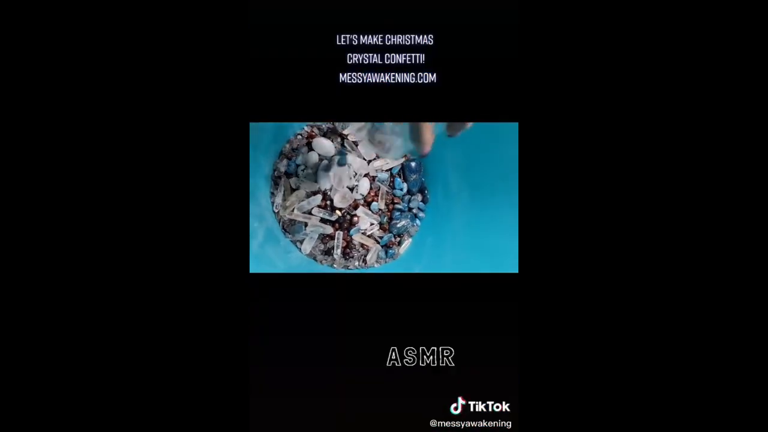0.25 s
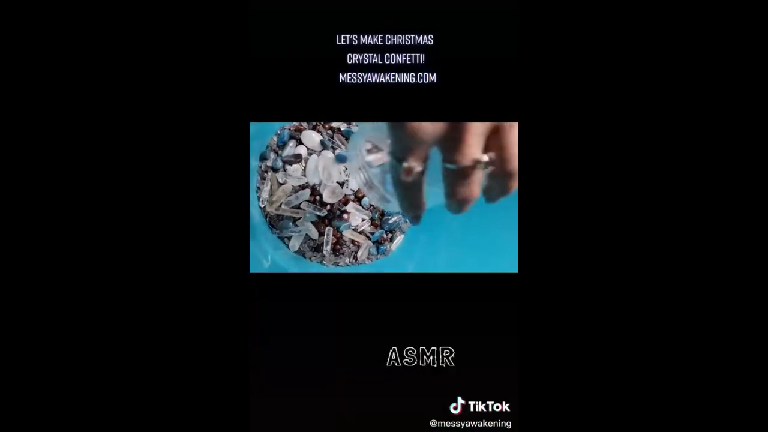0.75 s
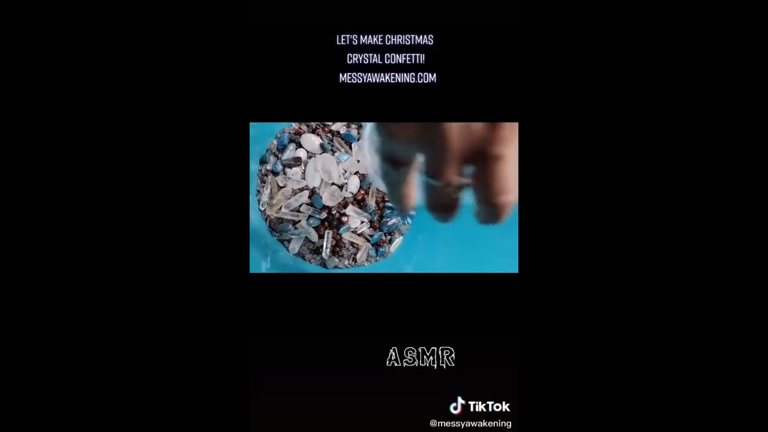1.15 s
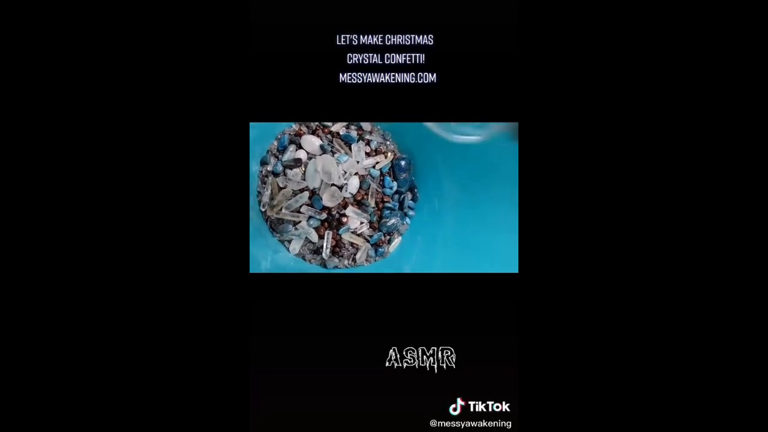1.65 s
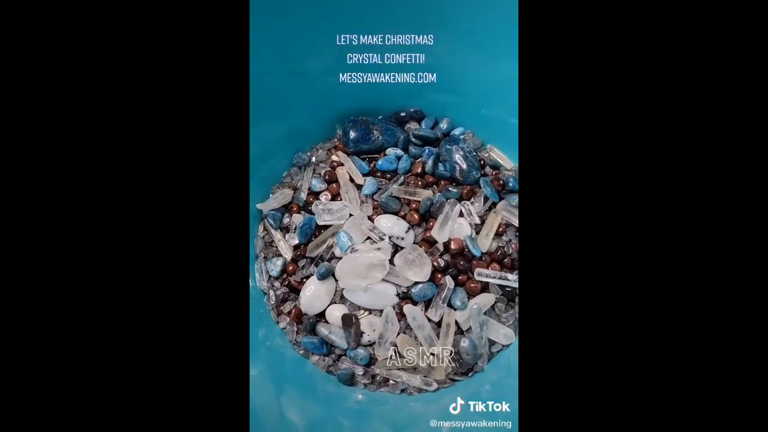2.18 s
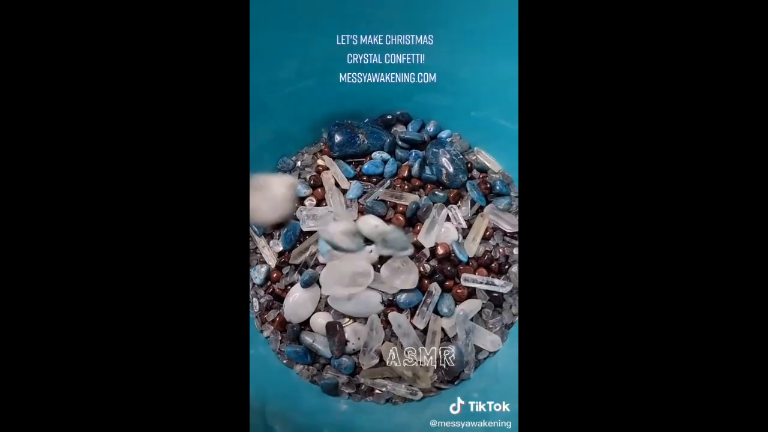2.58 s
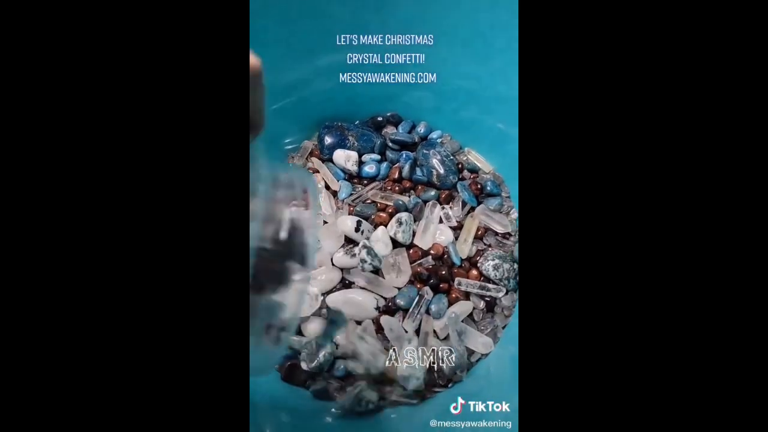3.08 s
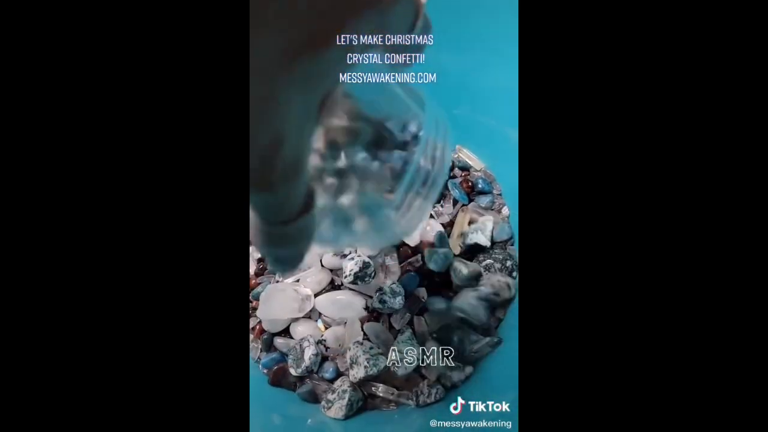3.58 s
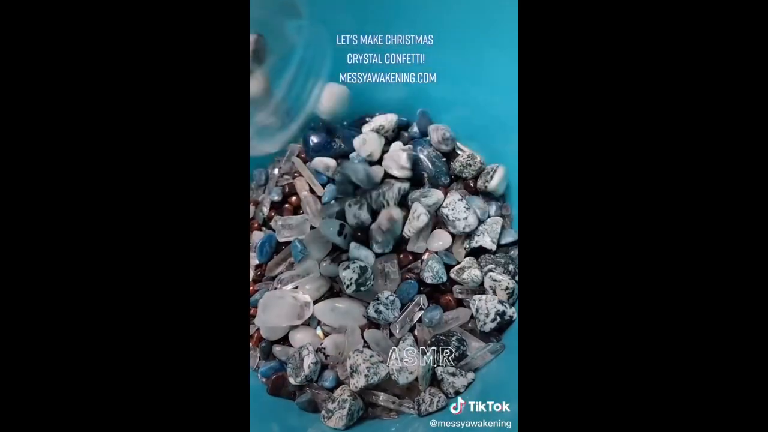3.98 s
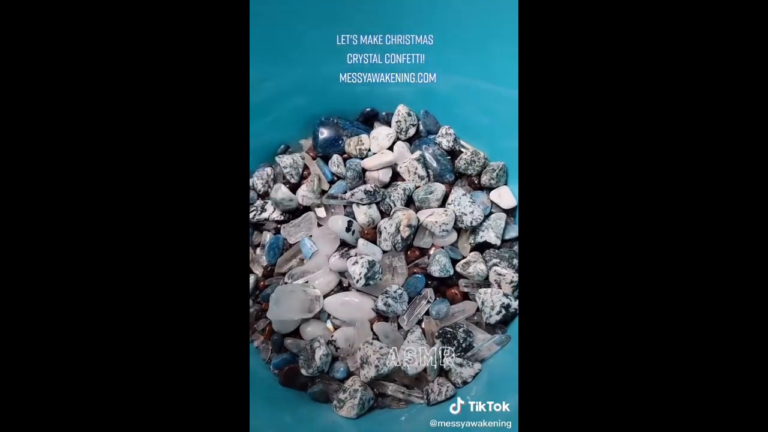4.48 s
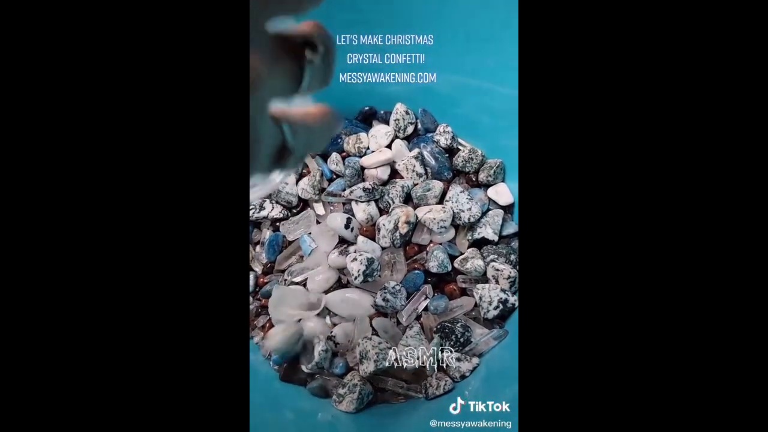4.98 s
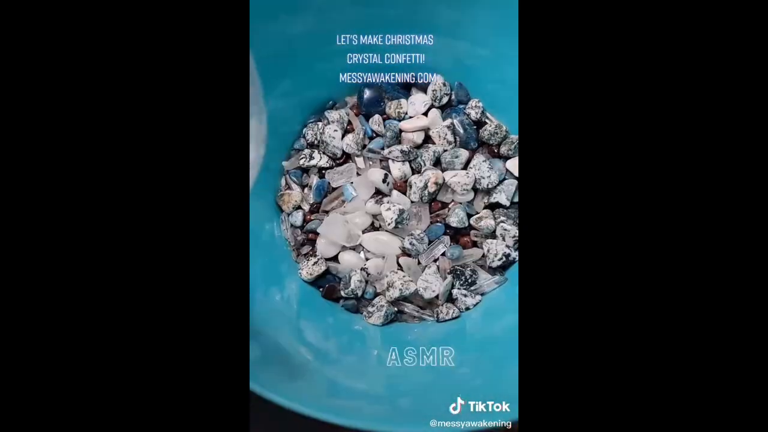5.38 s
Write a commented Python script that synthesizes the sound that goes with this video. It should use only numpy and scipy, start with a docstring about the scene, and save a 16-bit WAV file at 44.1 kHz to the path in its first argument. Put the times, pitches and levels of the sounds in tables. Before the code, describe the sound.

Small stone chips rattle and clink out of hollow-sounding glass jars onto a heap in a plastic bowl, close up, in separate bursts with brief silences.

```python
"""Stone chips poured from glass jars

Stone chips are shaken from glass jars onto a heap in a plastic bowl, close to the microphone. Single chips
clack and rebound over a dense stream of small ticks. Chips that roll and knock in the glass make the air in the
jar hoot: a wide jar low, a small jar an octave higher. Twice all sound stops for a moment, just as the small
jar takes over."""
import sys
import numpy as np
from scipy import signal
from scipy.fft import rfft, irfft
from scipy.io import wavfile
from scipy.ndimage import uniform_filter1d

SR = 44100
rng = np.random.default_rng(int(sys.argv[2]) if len(sys.argv) > 2 else 0)


def store_wav(level_fs):
    """Save 16-bit WAV to argv[1]."""
    pcm = np.round(np.clip(np.atleast_2d(level_fs), -1, 1) * 32767)
    wavfile.write(sys.argv[1], SR, pcm.T.astype(np.int16))


N = 249165
TIME = np.arange(N) / SR
SLOW_TIME = TIME[::32]  # coarse steps are enough for slow controls
EDGE_HZ = 10050  # the sound ends above this pitch

# chips knocking on the wall of the wide jar: t/s, level/dB (before a common trim), pitch of the air inside f/Hz
WIDE_JAR_KNOCKS = [(0.022, -17.5, 345), (0.133, -16, 346), (0.546, -15.5, 349), (0.593, -17, 375),
                   (0.711, -21, 337), (0.764, -18.5, 342), (0.862, -20, 325), (0.892, -21, 379),
                   (1.044, -19.5, 366), (1.11, -18, 367), (2.254, -14, 352), (2.444, -16, 311),
                   (2.644, -20.5, 254), (2.983, -21.5, 349), (3.256, -15, 315), (3.429, -10, 334),
                   (3.546, -11, 345), (3.574, -7, 342), (3.613, -6, 330), (3.685, -8.5, 328),
                   (3.801, -5.5, 332), (3.832, -7, 368), (3.996, -7.5, 360.6), (4.055, -6.5, 367),
                   (4.101, -16.5, 392), (4.518, -21.5, 350), (4.605, -23, 368), (4.649, -9, 330)]


def tick(contact_s=0.00017, ring_s=0.012, ring_db=-8, body_db=-3, body_s=0.0012, body_hz=1700, lowest_hz=900, count=4):
    """Stone on stone: a very short crack, the dull note of the chip's body and a few brief rings, varying by chip."""
    t = TIME[:SR // 100]
    crack = unit(rng.standard_normal(len(t)) * t * np.exp(-t / contact_s))
    note_hz = body_hz * 2 ** rng.uniform(-0.91, 1)
    body = unit(np.sin(2 * np.pi * note_hz * t) * np.exp(-t / body_s))
    hz = rng.uniform(lowest_hz, EDGE_HZ, (count, 1))
    life = ring_s * rng.uniform(.5, 2, (count, 1))
    rings = unit((np.sin(2 * np.pi * hz * t) * np.exp(-t / life)).sum(0))
    return unit(crack + amp(body_db) * body + amp(ring_db) * rings)


def stream(flow_db, per_s=1200, spread_db=1.5, crowding=.3, clump_db=2.5, count=400):
    """Chips of many shapes tick at random; a stronger flow means more of them at once, tumbling in clumps."""
    rate = per_s * amp(crowding * (flow_db - flow_db.max()))  # per_s holds at the strongest flow
    shapes = [tick() for _ in range(count)]
    ticks = np.zeros(N)
    luck = rng.random(N)
    size = amp(spread_db * rng.exponential(1, N))
    shape = rng.integers(0, count, N)
    for n in np.flatnonzero(luck < rate / SR):
        add(ticks, TIME[n], size[n] * shapes[shape[n]])
    clumps = uniform_filter1d(rng.standard_normal(N), size=520)
    ticks *= amp(clump_db * rate / rate.max() * clumps / clumps.std())
    return amp(flow_db) * evened(ticks)


def flow(attack_s=0.0045, fall_db_per_s=314, settle_db=-14, settle_s=0.34, lead_in_db=-18.5, lead_in_rise_db_per_s=304.5):
    """Level and treble of the stream in dB: slides start quickly, run and die away, while a few chips go on settling."""
    # each shake of a jar lets a slide of chips go; chips still inside the jar sound duller:
    # t/s, length/s, level/dB (before the stream's trim), treble/dB
    slides = [(0, 0.18, -31.5, -8.5), (0.169, 0.069, -27.5, 6.5), (0.297, .1, -24.5, 1.5),
              (0.514, 0.18, -34, -4.5), (0.707, 0.13, -32, 0), (0.914, 0.071, -44.5, 3),
              (1.191, 0.077, -40, -1.5), (1.313, 0.16, -40, 2.5), (1.735, 0.17, -24, 4),
              (2.007, 0.032, -36.5, 7), (2.107, 0.27, -22, 2), (2.2, 0.083, -17, -0.5),
              (2.424, 0.1, -22, 1.5), (2.53, 0.17, -27.5, 3), (2.599, 0.13, -26.5, 4),
              (2.749, 0.08, -24, 2), (2.855, 0.034, -20, 1), (2.986, 0.017, -19.5, -2.5),
              (3.041, 0.15, -23.5, 1), (3.233, 0.18, -22.5, -0.5), (3.465, 0.055, -20, -1.5),
              (3.557, 0.12, -20.5, 2), (3.703, 0.24, -21.5, 2), (3.99, 0.039, -24.5, 5),
              (4.094, 0.1, -29.5, -2), (4.261, 0.072, -30, 4.5), (4.782, 0.015, -37, 6.5),
              (4.84, 0.27, -44.5, -0.5), (4.953, 0.0099, -32.5, -9), (5.291, 0.052, -43, 11),
              (5.345, 0.28, -32.5, 10.5), (5.415, .1, -25, 6)]
    t = SLOW_TIME
    s, length, db, treble_db = np.transpose(slides)[:, :, None]
    before = np.maximum(s - t, 0)
    after = np.maximum(t - s - length, 0)
    lead_in = amp(lead_in_db - lead_in_rise_db_per_s * before)  # the first chips slip just before the rest
    attack = np.maximum(np.clip((t - s) / attack_s, 0, 1), lead_in)
    settling = amp(settle_db) * np.maximum(1 - after / settle_s, 0) ** 2
    release = np.maximum(amp(-fall_db_per_s * after), settling)
    power = (amp(db) * attack * release) ** 2 + 1e-12
    total = power.sum(0)
    mean_treble_db = (power * treble_db).sum(0) / total  # the loudest slide counts most
    return np.interp(TIME, t, 10 * np.log10(total)), np.interp(TIME, t, mean_treble_db)


def clacks(rebound_db=-5, rebound_s=0.004, contact_s=0.00053, body_s=0.0018, count=6, size=4096):
    """Each hard landing jostles its neighbours, which answer with smaller ticks."""
    # single chips that land hard: t/s, level/dB (over a millisecond), brightness/dB per octave
    landings = [(0.118, -14.5, -5), (0.16, -12, 3), (0.2523, -14.5, 0), (.268, -20, -5),
                (0.3116, -13, -0.5), (0.3603, -13.5, -4), (.384, -13.5, 1), (0.4004, -10, -2.5),
                (0.4841, -17.5, -3.5), (0.5883, -17.5, 1.5), (0.595, -10.5, -3), (.6189, -14.5, 1.5),
                (0.7257, -14, -1.5), (0.7574, -17.5, 1), (0.828, -20, 2), (0.8805, -12, 2),
                (1.1216, -14.5, 4), (1.1253, -23, -6), (1.1792, -15.5, 1.5), (1.245, -14, -1),
                (1.3246, -13, 1.5), (1.418, -27.5, 4), (1.5289, -27, 2), (1.7393, -9, -13.5),
                (1.745, -1.5, -4), (1.862, -8.5, -1), (1.916, -12, -0.5), (1.947, -16, 2.5),
                (1.965, -18, 2), (2.08, -22, -1), (2.115, -12, 4), (2.2323, -10.5, 2), (2.478, -10, 3),
                (2.544, -10.5, 0), (2.6172, -6.5, 1), (2.6302, -8.5, -0.5), (2.645, -7, 1),
                (2.762, -11.5, 5.5), (2.7784, -9.5, -0.5), (2.866, -11, 2), (2.881, -8.5, -1),
                (2.983, -15, -3), (3, -9.5, 4.5), (3.164, -11, 4), (3.238, -16, -5), (3.251, -8.5, -0.5),
                (3.301, -10, 2.5), (3.318, -9, 0.5), (3.3599, -8, -0.5), (3.4357, -11.5, 0.5),
                (3.454, -11, 0.5), (3.57, -12.5, 5), (3.64, -6, -1), (3.721, -12, 0), (3.76, -8.5, 0.5),
                (3.7844, -8.5, 4.5), (3.852, -7, 2), (3.954, -9.5, -1.5), (3.998, -13.5, 2),
                (4.042, -17.5, 1.5), (4.0762, -15, 2), (4.114, -12, 3.5), (4.1544, -11.5, 0),
                (4.181, -13.5, -4.5), (4.244, -8, 0), (4.284, -10, 0), (4.311, -7.5, -1),
                (4.398, -25.5, -2), (4.556, -26.5, -1), (4.648, -16.5, -9), (4.792, -10, 1.5),
                (4.8018, -8.5, 0), (4.864, -20.5, 3.5), (4.901, -18.5, 0.5), (4.912, -32, 34),
                (4.947, -13, -1), (4.9773, -23.5, -4), (5.075, -24, -2.5), (5.113, -25, 0),
                (5.2998, -27.5, 1), (5.46, -9.5, 2)]
    out = np.zeros(N)
    hz = np.fft.rfftfreq(size, 1 / SR)
    octaves = np.log2(np.clip(hz, 900, EDGE_HZ) / EDGE_HZ)
    audible = 1 / np.sqrt(1 + (hz / EDGE_HZ) ** 20)
    for s, db, brightness in landings:
        rebounds = np.zeros(size)
        for delay in rng.exponential(1, count):
            add(rebounds, delay * rebound_s, tick())
        hit = amp(rebound_db) * unit(rebounds)
        add(hit, 0, tick(contact_s=contact_s, body_s=body_s))
        tilt = amp(brightness * octaves)
        hit = unit(irfft(rfft(hit) * tilt * audible)[:size // 2])
        add(out, s, amp(db) * np.sqrt(SR / 1000) * hit)
    return out


def chips_by_jar(impacts, small):
    """The impacts take on a different colour for the chips of each jar."""
    # colour of the chips from each jar: f/Hz, relative level/dB per Hz
    wide_jar_chips = [(200, -11.5), (520, -2.5), (850, -2), (1350, -1.5), (1750, -4), (2800, -1), (4400, 0),
                      (7000, 1), (10000, -6.5)]
    small_jar_chips = [(200, -19), (900, -14), (1300, -11), (1950, -12.5), (2200, -2), (3500, -.5),
                       (4800, -2.5), (6500, -4), (10000, -14.5)]
    return colour(impacts * (1 - small), wide_jar_chips) + colour(impacts * small, small_jar_chips)


def bowl(impacts):
    """The falling chips shake the plastic bowl, which answers with low thuds."""
    # how heavily the chips shake the bowl: t/s, level/dB (against the impacts)
    weight = [(1.2, -22), (1.8, -30), (2.25, -17), (2.6, -11), (4.1, -8.5), (5.3, -28)]
    # colour of the bowl: f/Hz, relative level/dB per Hz
    bowl_colour = [(30, -15.5), (90, -15), (270, 14), (520, 10), (1200, -41.5)]
    return colour(impacts * amp(curve(weight)), bowl_colour)


def wide_jar(flow_db, small):
    """Knocks make the wide jar hoot low; rolling chips keep it hooting when the small jar is not pouring."""
    # resonances, the lowest being the air inside: f/Hz, t60/s (time to fall 60 dB), relative level/dB
    modes = [(354.6, 0.072, 8), (778, 0.04, -5), (2330, 0.15, -22)]
    knocking = knocks(WIDE_JAR_KNOCKS, modes, push_s=0.0056, level_db=-1.5)
    return knocking + (1 - small) * roll_strength(flow_db) * rolling(modes)


def roll_strength(flow_db, knock_db=-14.5, rise_s=0.021, fade_s=0.035, under_stream_db=-8):
    """How hard chips roll in the wide jar: a swell around each knock, and a share of the stream."""
    t = SLOW_TIME
    s, db, _ = np.transpose(WIDE_JAR_KNOCKS)[:, :, None]
    swells = amp(db + knock_db) * np.exp(-np.maximum((s - t) / rise_s, (t - s) / fade_s))
    around_knocks = np.interp(TIME, t, np.linalg.norm(swells, axis=0))
    return np.hypot(around_knocks, amp(flow_db + under_stream_db))


def small_jar(flow_db, small, roll_db=-1.5, idle_db=-41, mouth_hz=500):
    """The small jar hoots higher, from knocks and from chips rolling as it pours; its small mouth gives no bass."""
    # chips knocking on its wall: t/s, level/dB (before a common trim), pitch of the air inside f/Hz
    wall_knocks = [(1.742, -9.5, 737), (1.834, -6, 767), (2.118, -2.5, 722), (2.164, -2.5, 726),
                   (2.216, 0, 718), (2.265, -4, 743), (2.286, -1.5, 670), (2.353, 3.5, 690),
                   (2.404, -5, 680), (2.448, -1.5, 706), (5.301, -5.5, 766), (5.424, -4.5, 751),
                   (5.507, -4.5, 830), (5.533, -6.5, 746), (5.572, -7, 742), (5.635, -9, 727)]
    # its resonance, the air inside: f/Hz, t60/s (time to fall 60 dB), relative level/dB
    modes = [(730, .045, 0)]
    sound = knocks(wall_knocks, modes, push_s=0.0013, level_db=-5.0, scuff_db=-14)
    strength = np.hypot(amp(flow_db + roll_db), amp(idle_db))
    sound += small * strength * rolling(modes, per_s=450, wander_octaves=0.024, spread_db=-1.5)
    return low_cut(sound, mouth_hz)


def knocks(rows, modes, push_s, level_db, scuff_db=-12, scuff_s=0.002):
    """A clump of chips lands on the glass with a dull scuff, pushes for a few milliseconds, and the jar rings."""
    # colour of a clump of chips scuffing the glass: f/Hz, relative level/dB per Hz
    scuff_colour = [(80, -25.5), (250, 2.5), (900, -2.5), (2000, -4), (6000, -21.5)]
    out, t = np.zeros(N), TIME[:SR // 10]
    for s, db, cavity_hz in rows:
        note = ring(modes, cavity_hz) * (1 - np.exp(-(t / push_s) ** 2))
        rub = rng.standard_normal(len(t)) * t * np.exp(-t / scuff_s)
        scuff = colour(rub, scuff_colour)[:len(t)]
        note = unit(note) + amp(scuff_db) * unit(scuff)
        add(out, s, amp(db + level_db) * note / abs(note).max())
    return out


def rolling(modes, per_s=200, wander_octaves=0.084, spread_db=4, count=8):
    """Light taps of uneven strength keep a jar hooting roughly, each at a pitch that the shifting load allows."""
    hoot = np.zeros(N)
    for shift in np.linspace(-wander_octaves, wander_octaves, count):
        sizes = rng.choice([-1, 1], N) * amp(spread_db * np.minimum(rng.exponential(1, N), 2))
        taps = sizes * (rng.random(N) < per_s / count / SR)
        hoot += signal.oaconvolve(taps, ring(modes, modes[0][0] * 2 ** shift))[:N]
    return hoot / hoot.std()


def ring(modes, cavity_hz):
    """What a jar rings with after one tap; the load of chips shifts the pitch of its air but not of its glass."""
    t = TIME[:SR // 10]
    hz, t60, db = np.transpose(modes)
    waves = np.sin(2 * np.pi * np.outer([cavity_hz, *hz[1:]], t))
    return unit(amp(db) @ (decay(t, t60[:, None]) * waves))


def rim_clinks(t60=0.017):
    """A chip ticks on the rim, which rings briefly, damped by the hand."""
    # chips that clink on the rim of a jar: t/s, level/dB, f/Hz
    rim_hits = [(.079, -18.5, 1310), (0.382, -13.5, 1580), (3.007, -7, 3130), (3.546, -7.5, 3470),
                (3.936, -11.5, 2220), (4.396, -22, 1420), (4.736, -22, 2250)]
    out, t = np.zeros(N), TIME[:SR // 10]
    for s, db, hz in rim_hits:
        note = decay(t, t60) * np.sin(2 * np.pi * hz * t)
        add(note, 0, 2 * tick())
        add(out, s, amp(db) * note)
    return out


def room(x, t60, wet_db=-13):
    """Adds short, dense reflections from the bowl wall and the table."""
    t = TIME[:SR // 2]
    taps = rng.standard_normal(len(t)) * (rng.random(len(t)) < 1 / 10)
    return x + amp(wet_db) * signal.oaconvolve(x, unit(taps * decay(t, t60)))[:N]


def rumble(level_db=-52):
    """The room's steady low rumble, made of coloured noise."""
    # colour of the rumble: f/Hz, relative level/dB per Hz
    rumble_colour = [(25, -26), (75, -2), (160, -12.5), (350, -24), (1500, -31)]
    return amp(level_db) * colour(rng.standard_normal(N), rumble_colour)


def amp(db):
    """Decibels to gain."""
    return 10 ** (np.asarray(db) / 20)


def unit(x):
    """Scales a short sound to an energy of 1."""
    return x / np.sqrt(np.sum(x ** 2) + 1e-20)


def evened(x):
    """Holds the average strength (rms) over 20 ms near 1, keeping the finer grain."""
    power = abs(uniform_filter1d(x ** 2, size=SR // 50))
    return x / np.sqrt(power + 1e-3 * np.mean(x ** 2))


def add(mix, s, sound):
    """Mixes a sound in at time s, in seconds."""
    part = mix[max(round(s * SR), 0):][:len(sound)]
    part += sound[:len(part)]


def curve(rows):
    """A control, joined by straight lines in time."""
    return np.interp(TIME, *np.transpose(rows))


def during(spans):
    """1 inside the spans and 0 outside, with soft edges."""
    return uniform_filter1d(sum(1. * ((TIME > a) & (TIME < b)) for a, b in spans), size=64)


def decay(t, t60):
    """Amplitude of a ring that falls 60 dB in t60 seconds."""
    return np.exp(-np.log(1000) * t / t60)


def colour(x, points, size=2048):
    """Filters with the given spectrum, scaled to an energy of 1; it answers only after each sound, never before."""
    hz, db = np.transpose(points)
    log_hz = np.log(abs(np.fft.fftfreq(size, 1 / SR)) + 1)
    log_gain = np.log(amp(np.interp(log_hz, np.log(hz), db)))
    # the Hilbert transform finds the phase that makes the filter respond soonest
    taps = np.fft.ifft(np.exp(np.conj(signal.hilbert(log_gain)))).real[:size // 2]
    return signal.oaconvolve(x, unit(taps))[:N]


def low_cut(x, hz):
    """A second-order high-pass: weakens everything below the given pitch."""
    return signal.sosfilt(signal.butter(2, hz, "high", fs=SR, output="sos"), x)


def brighten(x, treble_db, corner_hz=4800):
    """Lifts or lowers the treble above a gentle corner."""
    treble = np.convolve(x, signal.firwin(17, corner_hz, pass_zero=False, fs=SR), "same")
    return x + (amp(treble_db) - 1) * treble


def scene(stream_db=-1):
    """The impacts sound directly and thud through the bowl, while the jar in the hand hoots."""
    # when the small jar pours: from t/s, to t/s
    small_jar_pours = [(1.7, 2.47), (5.2, 5.7)]
    small = during(small_jar_pours)
    flow_db, treble_db = flow()
    impacts = amp(stream_db) * brighten(stream(flow_db), treble_db) + clacks()
    landing = chips_by_jar(impacts, small) + bowl(impacts) + rim_clinks()
    jars = wide_jar(flow_db, small) + small_jar(flow_db, small)
    return (room(landing, t60=0.24) + jars + rumble())[None]


def record(dry, low_cut_hz=45):
    """The microphone's low cut, two brief moments of total silence, overload on the hardest hits, then the band
    limit."""
    # when all is silent: from t/s, to t/s
    silences = [(1.667, 1.737), (5.174, 5.284)]
    gated = low_cut(dry, low_cut_hz) * (1 - during(silences))
    clipped = np.clip(gated, -.9, .9)
    edge = signal.firwin(301, EDGE_HZ, window=("kaiser", 8), fs=SR)
    return signal.oaconvolve(clipped, edge[None], "same")


dry = scene()
out = record(dry)
store_wav(out)
```